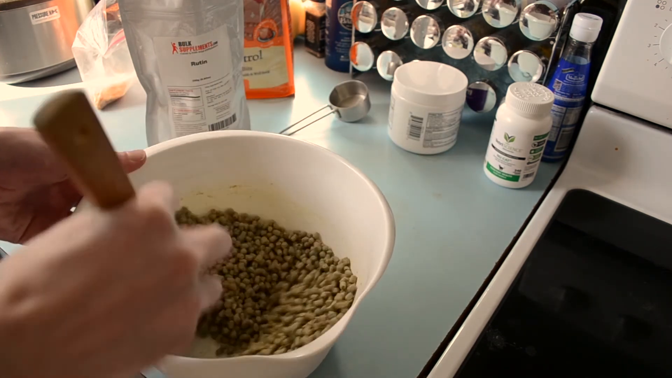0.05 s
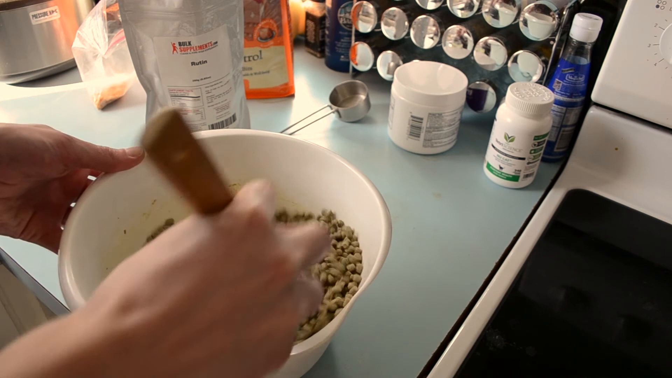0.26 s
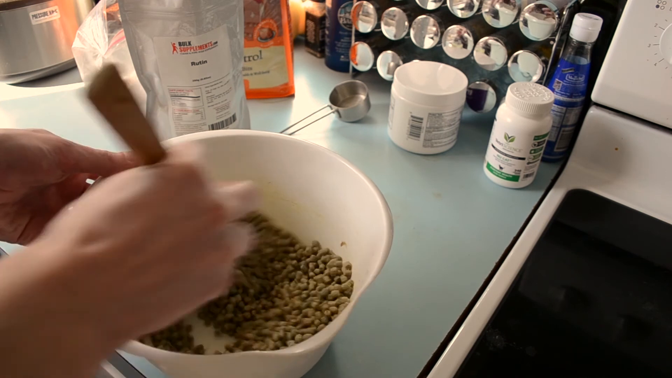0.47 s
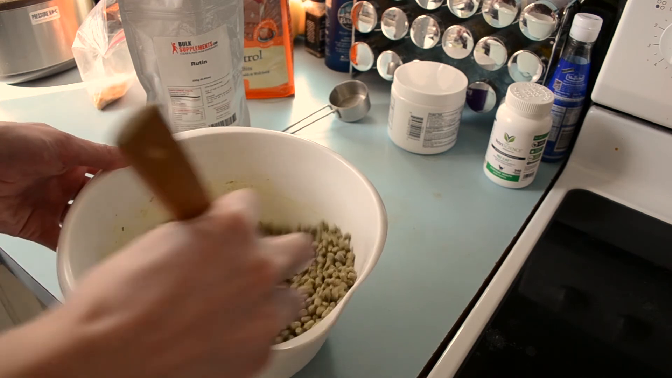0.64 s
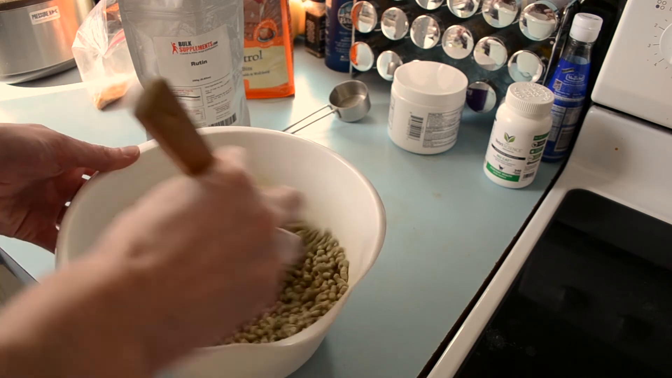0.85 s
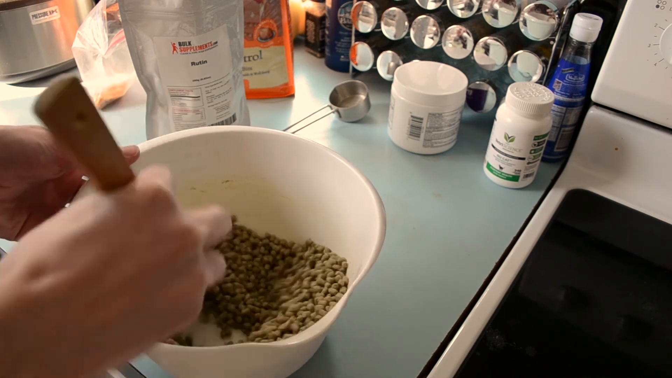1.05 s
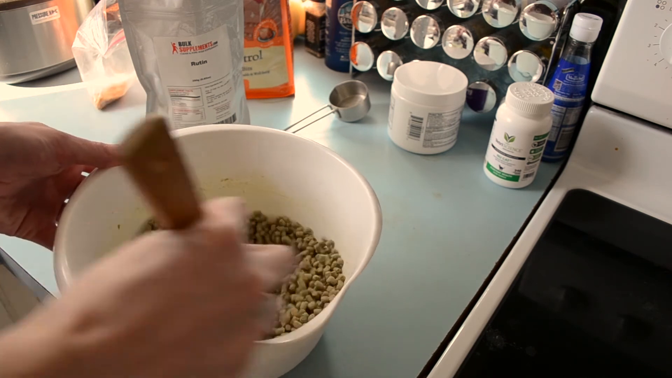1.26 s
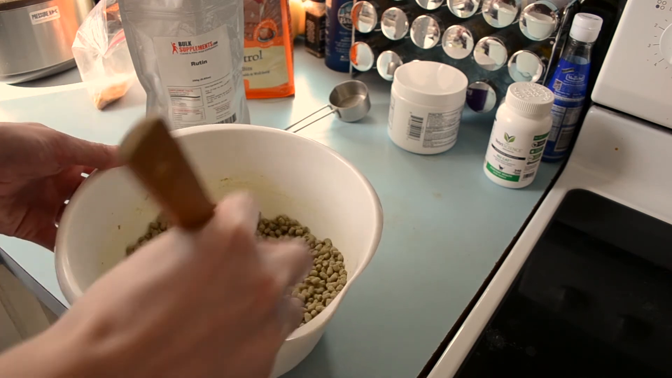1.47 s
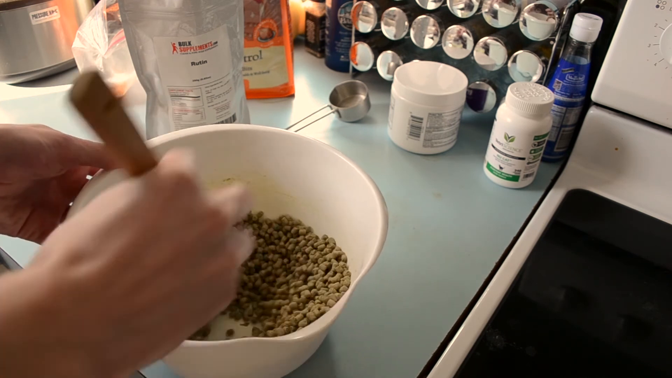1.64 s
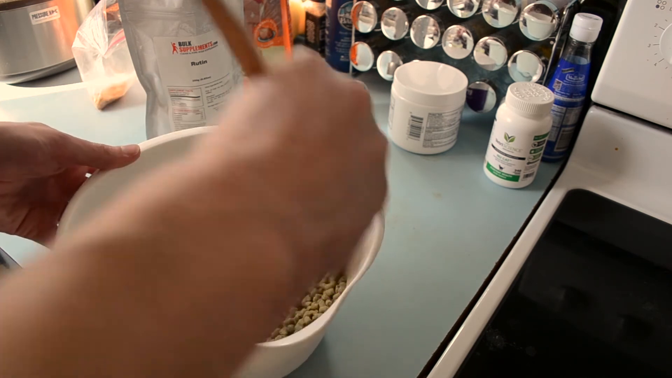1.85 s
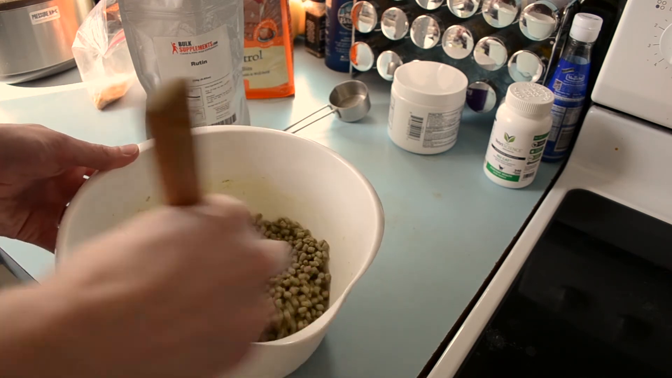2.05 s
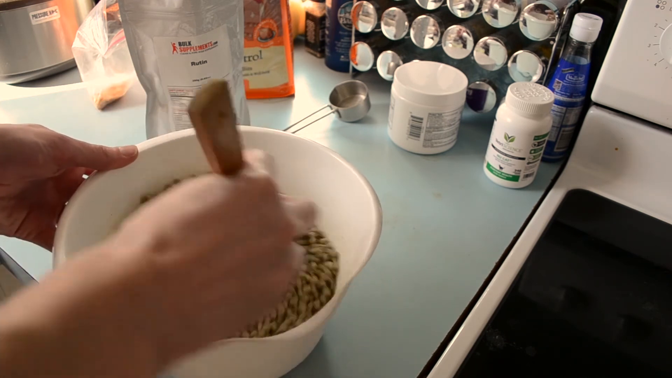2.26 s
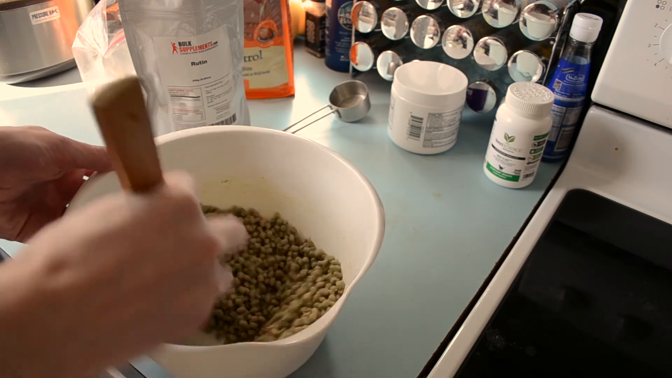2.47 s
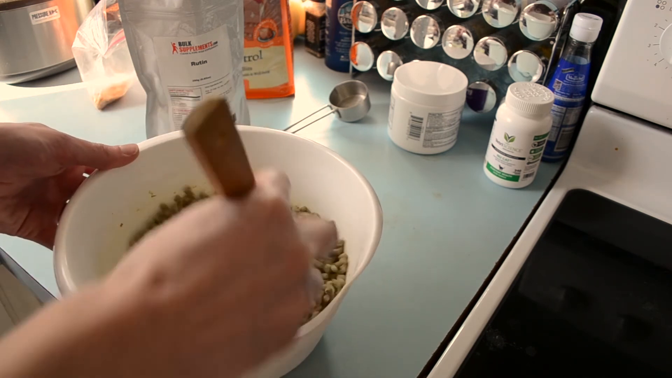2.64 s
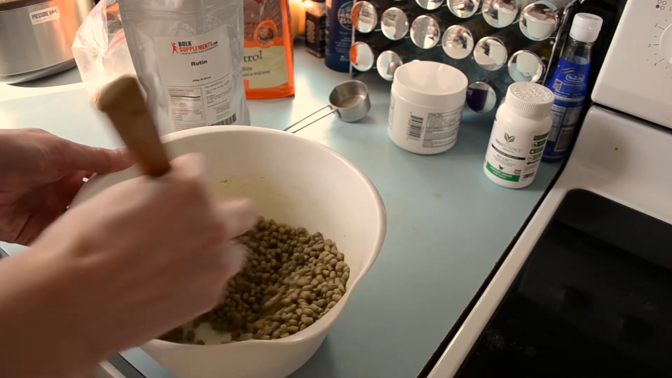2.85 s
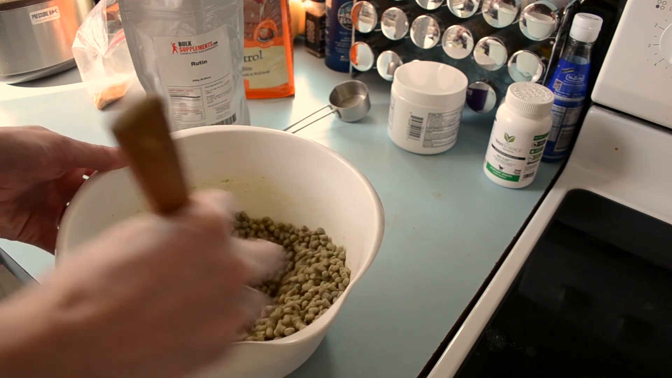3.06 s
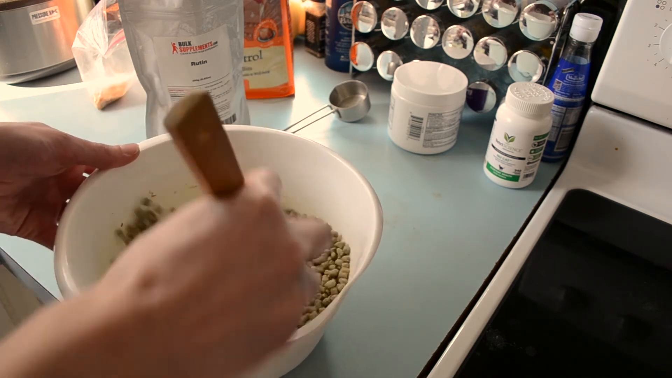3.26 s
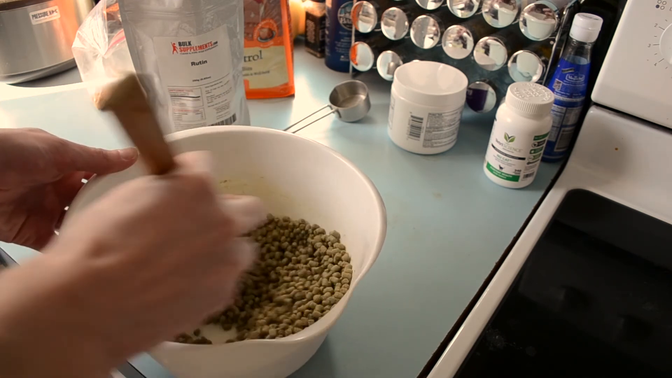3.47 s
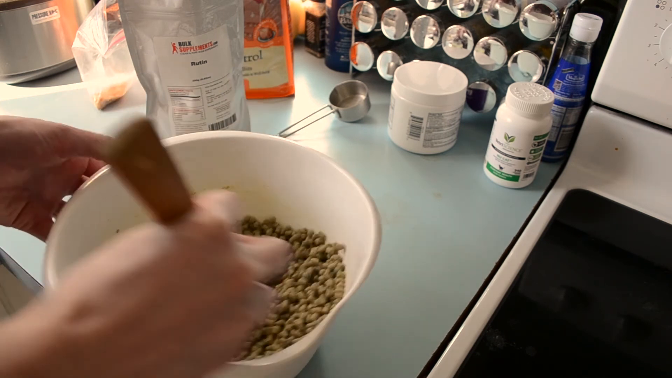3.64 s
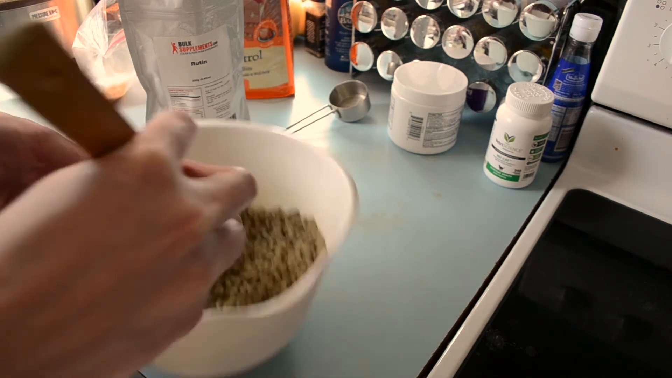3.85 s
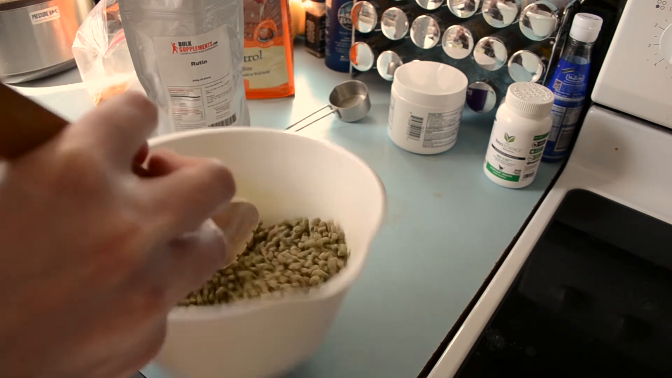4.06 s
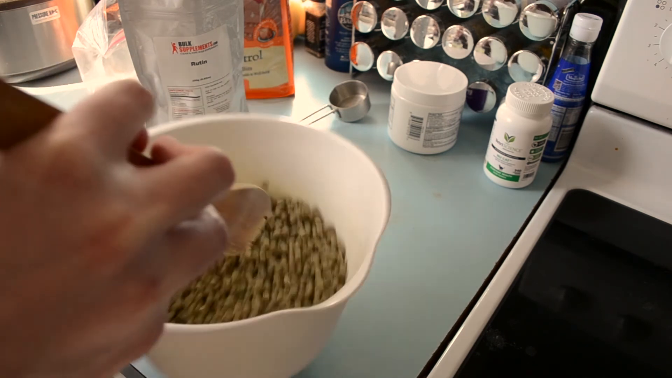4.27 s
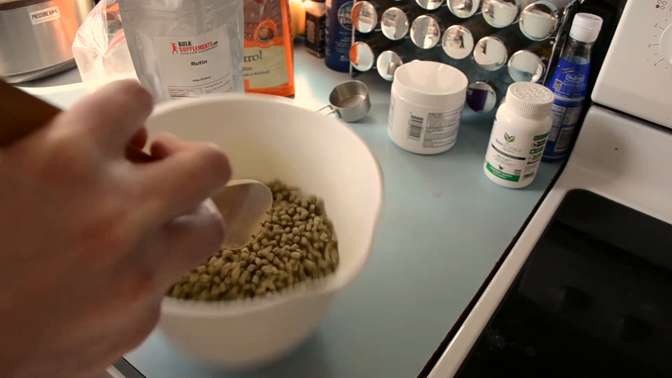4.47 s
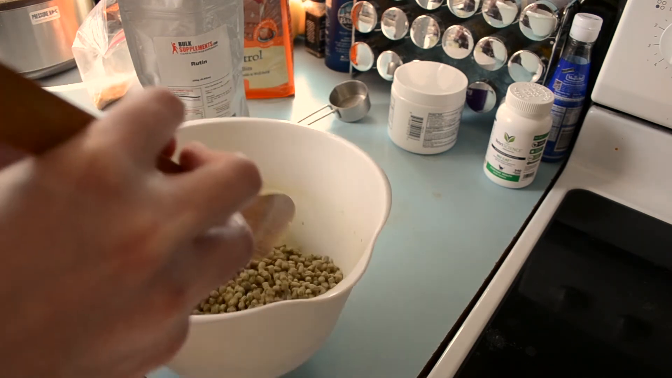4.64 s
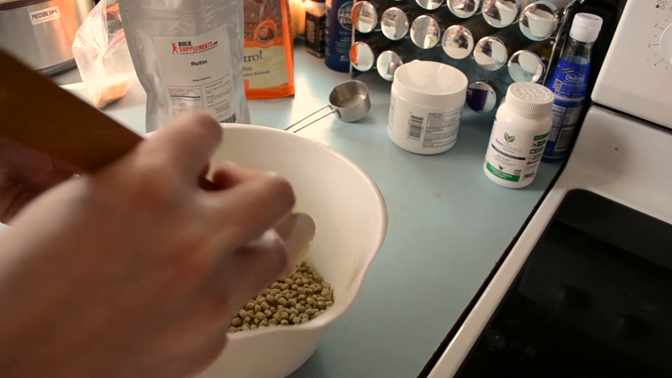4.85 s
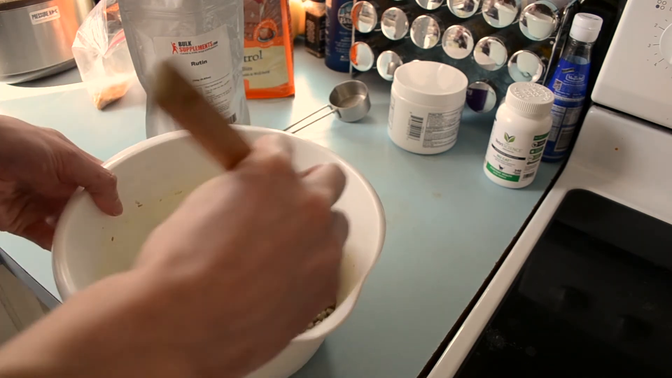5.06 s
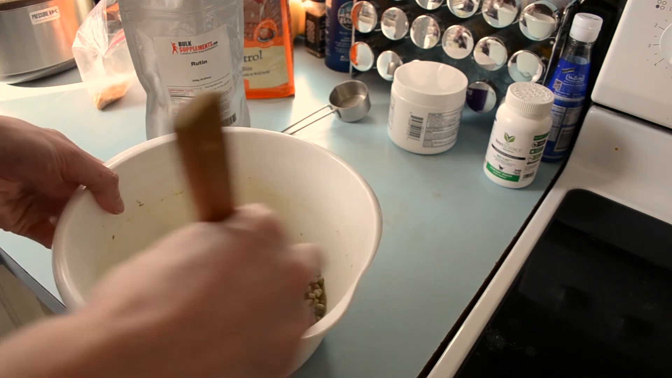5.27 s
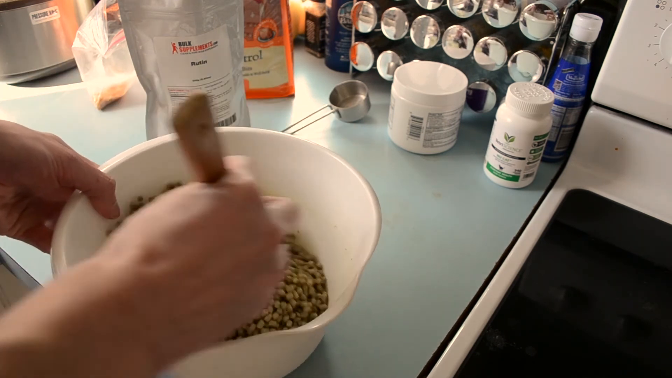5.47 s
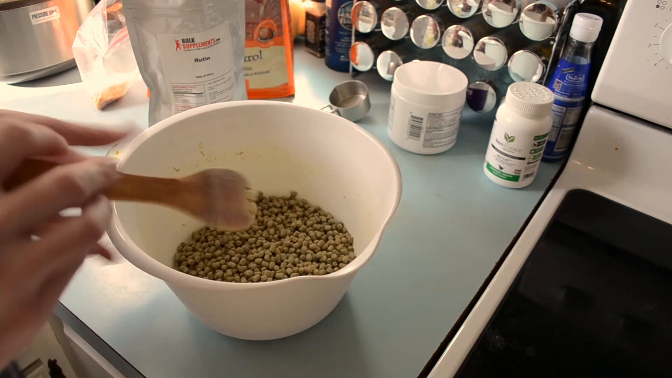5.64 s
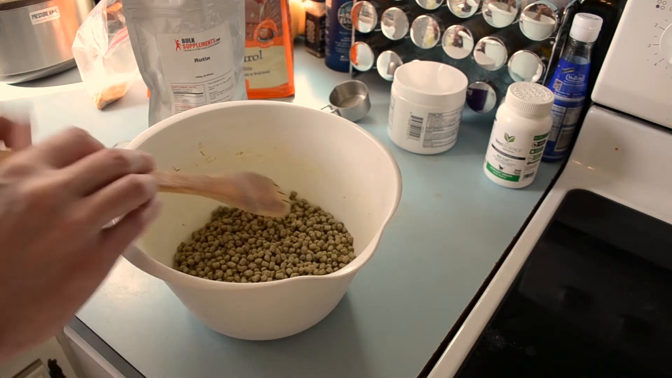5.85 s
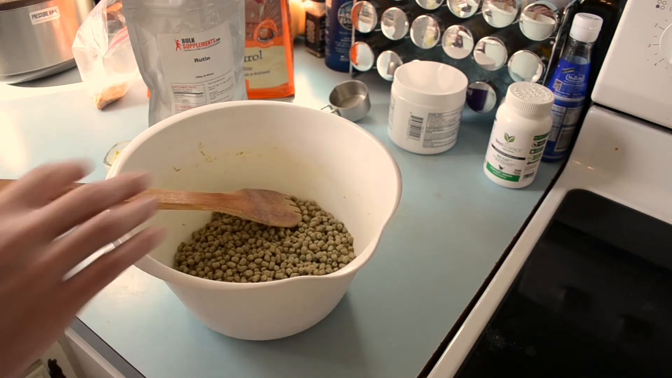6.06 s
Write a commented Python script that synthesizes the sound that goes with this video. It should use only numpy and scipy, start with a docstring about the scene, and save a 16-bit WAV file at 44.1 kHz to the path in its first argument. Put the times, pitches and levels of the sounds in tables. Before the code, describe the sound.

Dense dry clicking and rustling of pellets being stirred in a plastic bowl, heard close with a short room echo. Strokes rise and fall about two or three a second, with ticks and light knocks. Midway the flow nearly stops, then loud clattering slides and a rubbing scrape break out. Stirring returns briefly, stops abruptly to faint room noise, and a single hard hollow knock rings.

```python
"""A wooden spoon stirs hard pellets in a plastic bowl on a kitchen counter, heard from close by.
The pellets are dense random clicks, filtered and ringing; single ones crack or tick.
The bowl wall rumbles and is knocked (ringing modes), the base bumps, and once the bowl drags over the counter.
At a cut the stirring and its echo end at once; after a short pause the spoon taps the bowl hard.
Filtered noise makes the kitchen background, and decaying noise makes the echo of the room."""
import sys
import numpy as np
from scipy import signal
from scipy.fft import rfft, irfft
from scipy.io import wavfile

SR = 44100
rng = np.random.default_rng(int(sys.argv[2]) if len(sys.argv) > 2 else 0)


def dump_mix(stems):
    """Bounce the given channels to the path in sys.argv[1] as a 16-bit WAV at rate SR."""
    frames = np.atleast_2d(stems).T  # one column per channel
    limited = np.clip(frames, -1, 1)  # hard clip at full scale
    pcm = np.round(limited * 32767).astype(np.int16)
    wavfile.write(sys.argv[1], SR, pcm)


N = 269539   # length [samples]
CUT_S = 5.683   # the sound is cut: stirring and echo end at once [s]

# All levels in the tables are relative ones.
# vigour of the stirring, heard as the trickle of loose pellets: (time [s], level [dB])
TRICKLE = [(0.0, -38), (0.28, -37.5), (0.375, -44.5), (0.39, -37.5), (1.25, -39), (1.3, -44.5), (1.52, -42),
           (1.69, -45), (1.8, -55.5), (1.855, -70), (1.93, -50), (2.1, -42), (2.42, -39), (3.3, -38.5),
           (3.39, -46.5), (3.405, -38), (3.58, -38), (3.66, -49), (3.8, -59), (3.95, -66), (4.7, -59.5),
           (4.95, -74), (5.13, -59), (5.25, -40.5), (5.68, -39)]
TRICKLE_TREBLE_DB, TRICKLE_WALL_DB = 2.5, -14   # against the trickle

# the spoon ploughs through the heap, a dull swell:
# (time of the crest [s], rise [s], fall [s], pellet level [dB], bowl wall level [dB])
STROKES = [(0.0, .05, 0.099, -29, -41.5), (0.435, .03, 0.1, -35, -42.5), (0.56, 0.17, 0.12, -35, -63),
           (0.87, 0.2, 0.16, -34.5, -49.5), (1.23, 0.11, 0.072, -31.5, -57),
           (1.51, 0.23, 0.041, -31.5, -52.5), (2.1, 0.1, 0.056, -37, -43), (2.46, 0.19, 0.084, -32, -50.5),
           (2.848, 0.24, 0.033, -31.5, -46.5), (3.13, 0.027, 0.45, -35.5, -49),
           (3.41, 0.0082, 0.17, -32.5, -53), (3.57, 0.049, 0.3, -38, -53.5),
           (5.27, 0.087, 0.068, -47.5, -48), (5.52, 0.071, 0.11, -31, -52), (5.67, 0.14, 0.072, -33, -49)]
SWELL_DB, STROKE_TREBLE_DB = 12.5, -5   # drop from the crest after one rise or fall time; treble offset

# the heap is jolted and slides:
# (time at full strength [s], rise [s], hold [s], level [dB], treble against the rest [dB])
SLIDES = [(1.764, .005, 0.011, -38.5, -28), (1.885, .003, 0.021, -40.5, -16),
          (1.974, .02, 0.022, -41.5, -2), (2.215, .005, .1, -42.5, 13), (3.683, .01, 0.033, -39.5, -1),
          (3.842, .003, 0.026, -37, -19), (4.007, .03, .03, -40.5, -27), (4.04, .005, 0.032, -37.5, -6),
          (4.093, .03, 0.031, -34, -13), (4.202, .02, 0.014, -29, 2), (4.251, .02, 0.02, -36, 2.5),
          (4.353, .03, 0.026, -29, -0.5), (4.392, .02, 0.026, -34, -8), (4.455, .003, 0.036, -24.5, 6),
          (4.515, .01, 0.012, -26, -27), (4.626, .04, 0.021, -24.5, -12.5), (4.718, .01, 0.013, -38.5, -16),
          (4.983, .02, 0.019, -43.5, -4)]
SLIDE_RISE_DB, SLIDE_WALL_DB = 19, -24.5   # climb in one rise time; wall against the pellets
SLIDE_FALL_DB_PER_S, TREBLE_FALL_DB_PER_S = 310, 467

# the spoon opens a hollow in the heap: (time [s], middle of its wandering pitch [Hz])
HOLLOW = [(0.0, 2050), (1.27, 2330), (1.65, 1720), (2.28, 2260), (4.21, 2290), (4.6, 1790), (5.09, 1660),
          (5.39, 2260), (5.68, 2470)]
# colour of the pellets: (frequency [Hz], level per Hz [dB])
PELLET_COLOUR = [(410, -33), (700, -8.5), (968, -10), (1050, -7), (1450, -1.5), (2880, -3), (6600, -7.5),
                 (7420, -11), (8780, -7), (9370, -11), (10800, -29), (12100, -33), (14000, -27),
                 (15500, -45)]
# ringing modes of the bowl wall: (frequency [Hz], level [dB], time to fall by 60 dB [s])
BOWL_MODES = [(188, -13.5, 0.028), (236, -11, 0.088), (340.3, -3.5, 0.051), (416, 0.5, 0.061),
              (493.3, -2.5, 0.11), (543, -3, 0.076), (616, 1.5, 0.048), (768, -6, 0.064), (953, -10, 0.056),
              (1049, -5, 0.095), (1186, 3.5, 0.024), (1178, -3, 0.05), (1385, 7.5, 0.015), (1510, 2, 0.061),
              (1660, -6.5, 0.16), (1810, 1, 0.036), (2150, -15.5, 0.033), (2540, 8, .02), (3000, 0, 0.037),
              (3980, -16, 0.0025)]
# kitchen background: (frequency [Hz], level per Hz [dB])
KITCHEN_COLOUR = [(18, -61), (30, -18), (92, -10.5), (164, -24), (243, -12), (300, -12.5), (1140, -12.5),
                  (1970, -8.5), (3150, -13.5), (4790, -11.5), (7470, -24.5), (9210, -20), (15500, -65)]
KITCHEN_BEFORE_DB, KITCHEN_AFTER_DB = -64.7, -58   # before and after the cut

# spoon and pellets knock the wall: (time [s], peak level [dB], hardness as tilt of the modes [dB per octave])
KNOCKS = [(0.004, -21.5, -5), (0.283, -33.5, -4.5), (0.305, -30.5, -6), (0.429, -28.5, -0.5),
          (0.517, -34, -1), (0.616, -40, -3), (0.646, -30.5, -5.5), (1.073, -28, -0.5), (1.73, -42, 1.5),
          (1.865, -32, -0.5), (2.091, -32, -1.5), (2.166, -31.5, -2.5), (2.245, -37.5, -7),
          (2.373, -29, -3), (2.519, -31, -1.5), (2.688, -37, -5), (2.816, -29, 1), (2.831, -28, -4),
          (3.128, -31, 0), (3.429, -29, -2), (3.951, -40.5, -6.5), (4.455, -18, -6.5), (4.518, -22.5, 2),
          (4.533, -26.5, -5), (4.542, -25, -4.5), (4.567, -19.5, -3.5), (4.954, -18, -4), (5.08, -36, -6),
          (5.121, -39.5, -1), (5.138, -35.5, -6.5), (5.405, -27.5, -3.5), (5.984, -16.5, -0.5)]
# reverberation: (frequency [Hz], time to fall by 60 dB [s])
ROOM = [(150, 0.67), (500, 0.35), (2000, 0.43), (3500, .25), (6000, 0.1), (12000, 0.13)]

# smaller cracks at random: how many; middle values of peak over the heap, pitch and treble
SMALL_CRACKS = 30
SMALL_DB, SMALL_HZ, SMALL_TREBLE_DB = 8.5, 2140, -13
# single cracks and ticks at set times, loud and quiet:
# (time [s], peak level [dB], pitch [Hz], treble against the peak [dB])
TIMED_CRACKS = [(0.386, -23, 2430, -9), (0.4299, -14.5, 1780, -21), (0.503, -15, 2510, -28),
                (0.5726, -14, 2770, -22), (0.7094, -17, 1770, -13.5), (0.8016, -15, 2450, -30),
                (0.869, -15, 2300, -27), (0.9725, -26.5, 1960, -0.5), (1.148, -18, 2340, -10),
                (1.1694, -16.5, 2800, -22), (1.232, -22.5, 1960, -17), (1.3124, -34, 2250, 3.5),
                (1.383, -24, 1530, -21), (1.5973, -23, 1455, -11.5), (1.633, -19.5, 1870, -30),
                (1.682, -20.5, 1760, -13.5), (1.7258, -31.5, 1640, -7), (1.7644, -25, 4340, -7),
                (1.8257, -31.5, 2370, -27), (1.8672, -22.5, 2350, -24), (1.884, -34, 3050, -15),
                (2.0297, -20, 2380, -18), (2.2155, -26.5, 2940, -3.5), (2.3254, -14.5, 4240, -14.5),
                (2.4777, -13.5, 2980, -21), (2.708, -17.5, 2060, -15.5), (2.8522, -11, 2840, -28),
                (3.004, -16, 5200, -13), (3.0092, -25, 2130, -6), (3.048, -30, 1740, -19),
                (3.4028, -17.5, 4430, -25), (3.4994, -16, 2600, -15.5), (3.5734, -15.5, 2580, -45),
                (3.6845, -23, 1940, -10), (3.7238, -24, 3000, -4.5), (3.8011, -23.5, 2220, -26),
                (3.8415, -26.5, 4740, -12), (4.034, -31, 2300, -4.5), (4.184, -19, 2250, -16),
                (4.2025, -16.5, 1930, -14), (4.2434, -11.5, 2240, -17), (4.273, -16, 2880, -29),
                (4.3412, -24, 1790, -29), (4.4528, -5.5, 2150, -19), (4.4814, -26, 1620, -23),
                (4.4955, -7.5, 2850, -17), (4.6347, -5.5, 2340, -20), (4.7193, -27, 1940, -15.5),
                (4.779, -23, 2350, -33), (4.8199, -20.5, 2450, -39), (4.857, -31.5, 2280, -26),
                (4.9561, -6, 1735, -48), (5.0813, -25.5, 1870, -30), (5.262, -19, 1595, -13),
                (5.4675, -23, 4000, -6), (5.5142, -14, 2270, -32.5), (5.5958, -15, 2600, -14),
                (5.9675, -37, 5420, -12), (5.972, -23, 5150, -25), (5.9842, -1, 2144, -43),
                (6.0886, -29, 2130, -33)]
# dull bumps of the base on the counter: (time [s], peak level [dB])
BUMPS = [(2.259, -48), (4.457, -64), (5.983, -36)]

# the bowl drags over the counter: (time [s], level [dB])
DRAG = [(4.505, -51), (4.523, -20.5), (4.54, -16), (4.551, -26.5), (4.649, -22), (4.76, -68)]
# modes of the base rubbing on the counter: (frequency [Hz], width [Hz], level [dB])
COUNTER_MODES = [(485, 49, 5.5), (580, 110, 4), (775, 75, 3), (925, 59, 4.5), (1264, 57, 3),
                 (1760, 37, -7.5), (2340, 90, -30)]


def amp(db):
    """Gain of a level in dB."""
    return 10 ** (np.asarray(db) / 20)


def power_db(*levels_db):
    """Level of unrelated sounds together: their powers add."""
    return 10 * np.log10(sum(amp(db) ** 2 for db in levels_db) + 1e-20)


def rms_one(x):
    """Scale to rms 1."""
    return x / np.sqrt(np.mean(x ** 2) + 1e-20)


def in_time(rows):
    """Draw straight lines between table rows: one value per sample for each column after the time."""
    s, *columns = np.transpose(rows)
    return [np.interp(np.arange(N) / SR, s, c) for c in columns]


def at_hz(points, hz):
    """Read a table on a log-frequency axis."""
    table_hz, values = np.array(points)[:, 0], np.array(points)[:, 1]
    return np.interp(np.log(hz), np.log(table_hz), values)


def filtered(x, order, hz, kind="low"):
    """Butterworth filter: keep what lies below, above or between the given frequencies."""
    return signal.sosfilt(signal.butter(order, hz, kind, fs=SR, output="sos"), x)


def colour(x, spectrum):
    """Causal (minimum-phase) filter of that spectrum; white noise keeps its rms."""
    size = 4096
    hz = np.maximum(np.arange(size // 2 + 1) * SR / size, 1)
    log_gain = at_hz(spectrum, hz) * np.log(10) / 20
    # folding the cepstrum forward in time makes the filter respond as early as it can
    cepstrum = irfft(log_gain)
    cepstrum[1:size // 2] *= 2
    cepstrum[size // 2 + 1:] = 0
    response = irfft(np.exp(rfft(cepstrum)))
    return signal.fftconvolve(x, response / np.linalg.norm(response))[:N]


def drift(rate):
    """Slow random wandering of rms 1, smoothed above the rate in Hz."""
    r = np.exp(-2 * np.pi * rate / SR)
    noise = rng.standard_normal(N + SR)
    settled = signal.lfilter([1], [1, -2 * r, r * r], noise)[SR:]
    return rms_one(settled)


def ring(clicks, hz, t60):
    """A unit click sets a sine of height about 1 ringing; it falls by 60 dB in t60 seconds."""
    r, w = amp(-60 / (t60 * SR)), 2 * np.pi * hz / SR
    return signal.lfilter([0, np.sin(w)], [1, -2 * r * np.cos(w), r * r], clicks + 1e-18)


def grains(per_s, spread_db):
    """Random clicks, mostly small, a few large; rms 1."""
    heights = amp(spread_db * np.minimum(rng.exponential(1, N), 5))
    signs = rng.choice([-1, 1], N)
    return rms_one(heights * signs * (rng.random(N) < per_s / SR))


def heap_motion():
    """Trickle, strokes and slides add up to the levels of the pellets, their treble and the wall."""
    t, trickle = np.arange(N) / SR, in_time(TRICKLE)[0]
    body, treble, shell = [trickle], [trickle + TRICKLE_TREBLE_DB], [trickle + TRICKLE_WALL_DB]
    for s, rise_s, fall_s, db, wall_db in STROKES:
        side_s = np.where(t < s, rise_s, fall_s)
        shape = -SWELL_DB * np.abs((t - s) / side_s) ** 0.87
        body.append(db + shape)
        treble.append(db + STROKE_TREBLE_DB + shape)
        shell.append(wall_db + shape)
    for s, rise_s, hold_s, db, treble_db in SLIDES:
        rise = SLIDE_RISE_DB * np.minimum(t - s, 0) / rise_s
        after = np.maximum(t - s - hold_s, 0)
        body.append(db + rise - SLIDE_FALL_DB_PER_S * after)
        treble.append(db + treble_db + rise - TREBLE_FALL_DB_PER_S * after)
        shell.append(body[-1] + SLIDE_WALL_DB)
    pellet_db = power_db(*body)
    return pellet_db, power_db(*treble) - pellet_db, power_db(*shell)


def pellets(level_db, treble_db):
    """Collisions come in clumps and ring a few cycles, loudest near the hollow's pitch, over a fine rustle."""
    clumps = amp(2.0 * drift(25) + 1.7 * drift(90))
    hits = grains(2500 * clumps, spread_db=3.0)
    pitches = np.geomspace(900, 6500, 24)
    dealt = rng.integers(0, 24, N)   # which pitch each hit gets
    hollow_hz = in_time(HOLLOW)[0] * 2 ** (0.12 * drift(32))
    rings = np.zeros(N)
    for k, hz in enumerate(pitches):
        octaves_off = np.log2(hz / hollow_hz)
        boost = amp(6.2 * np.exp(-(octaves_off / 0.41) ** 2))
        rings += rms_one(ring(hits * (dealt == k), hz, 15.5 / hz)) * np.sqrt(hz) * boost
    rustle = grains(14000 * clumps, spread_db=2.2)
    heap = colour(amp(-3.5) * rms_one(rings) + rustle, PELLET_COLOUR)
    low, high = filtered(heap, 2, 4000), filtered(heap, 2, 4000, "high")
    # with one part turned over, the two join without a dip at 4 kHz
    return amp(level_db - 7.5) * (low - amp(treble_db - 1) * high)


def wall(level_db):
    """Pellets pushed along the wall keep its low modes rumbling."""
    push = filtered(grains(900 * amp(2.5 * drift(30)), spread_db=2.5), 2, 750)
    modes = sum(amp(db) * ring(push, hz, t60) * (-1) ** k   # every other mode is turned over
                for k, (hz, db, t60) in enumerate(BOWL_MODES))
    return amp(level_db - 1.0) * rms_one(modes)


def kitchen(before):
    """Steady coloured noise, a little louder after the cut."""
    level_db = np.where(before, KITCHEN_BEFORE_DB, KITCHEN_AFTER_DB)
    return amp(level_db) * colour(rng.standard_normal(N), KITCHEN_COLOUR)


def knocks():
    """Each mode gets its own strength; a hard blow reaches the high modes; loose pellets rattle after it."""
    s, peak_db, tilt_db = np.transpose(KNOCKS)
    at, out = np.round(s * SR).astype(int), np.zeros(N)
    chance_db = rng.normal(0, 2.9, (len(KNOCKS), len(BOWL_MODES)))
    rattle = amp(-8.5) * (rng.random(N) < 250 / SR) * rng.standard_normal(N)   # 250 clicks per second
    fade = np.exp(-1 / (0.033 * SR))   # the rattle dies with a time constant of 33 ms
    for k, (hz, level_db, t60) in enumerate(BOWL_MODES):
        clicks = np.zeros(N)
        clicks[at] = amp(peak_db + level_db - 8.5 + tilt_db * np.log2(hz / 500) + chance_db[:, k])
        clicks += rattle * signal.lfilter([1], [1, -fade], clicks + 1e-18)
        out += ring(clicks, hz, t60) * (-1) ** k
    return out


def room(x):
    """Echo of the kitchen: noise that dies band by band."""
    t, edges = np.arange(SR // 2) / SR, 100 * 2. ** (np.arange(15) / 2)   # half-octave bands
    echo = np.zeros(len(t))
    for low, high in zip(edges, edges[1:]):
        band = filtered(rng.standard_normal(len(t)), 2, [low, high], "band")
        echo += band * amp(-60 * t / at_hz(ROOM, np.sqrt(low * high)))
    echo *= np.clip(t / 0.0017, 0, 1)   # the echo fades in over 1.7 ms
    return x + amp(-14.5) * signal.fftconvolve(x, echo / np.linalg.norm(echo))[:N]


def small_cracks(level_db):
    """Random rows like those of the timed cracks, more frequent where the stirring is brisk."""
    share = np.cumsum(amp(in_time(TRICKLE)[0]) * (np.arange(N) < CUT_S * SR))
    chance, spread = rng.random(SMALL_CRACKS), rng.standard_normal((SMALL_CRACKS, 3))
    at = np.searchsorted(share, chance * share[-1])
    peak_db = level_db[at] + SMALL_DB + 3 * spread[:, 0]
    pitch_hz = SMALL_HZ * 2 ** (0.344 * spread[:, 1])
    treble_db = SMALL_TREBLE_DB + 4 * spread[:, 2]
    return list(zip(at / SR, peak_db, pitch_hz, treble_db))


def cracks(rows):
    """A short ring at the pellet's pitch, with a sharp burst of noise and a softer tail that fades more slowly."""
    body, top, t = np.zeros(N + SR), np.zeros(N + SR), np.arange(SR // 20) / SR
    puff_fade = np.exp(-t / 0.0009) + 0.5 * np.exp(-t / 0.0059)
    puffs = rng.standard_normal((len(rows), len(t))) * puff_fade
    for (s, peak_db, hz, treble_db), puff in zip(rows, puffs):
        at = round(s * SR)
        tone = np.sin(2 * np.pi * hz * t) * np.exp(-t * hz / 12.3)   # fades over a few cycles
        near = signal.lfilter(*signal.butter(1, [hz * 0.59, hz * 1.73], "band", fs=SR), puff)
        body[at:at + len(t)] += amp(peak_db - 12.0) * (0.32 * tone + 1.43 * near)
        top[at:at + len(t)] += amp(peak_db + treble_db + 4.0) * puff
    high = filtered(top, 2, 4000, "high")
    return colour((body + high)[:N], PELLET_COLOUR)


def bumps():
    """One slow push each: a dull 82 Hz ring that the counter damps within a few hundredths of a second."""
    clicks = np.zeros(N)
    clicks[[round(s * SR) for s, db in BUMPS]] = [amp(db) for s, db in BUMPS]
    return ring(clicks, 82, 0.033)


def drag():
    """Uneven slips of the base excite bowl and counter together; part of each slip is heard bare."""
    t = np.arange(N) / SR
    slips = grains(1000, spread_db=2.0)
    modes = np.zeros(N)
    for k, (hz, width, db) in enumerate(COUNTER_MODES):
        t60 = np.log(1000) / (np.pi * width)   # a wide mode dies quickly
        modes += amp(db) * rms_one(ring(slips, hz, t60)) * (-1) ** k
    bare = filtered(slips, 2, [400, 2200], "band")
    # 17 ms ramps at the start and the end of the drag
    moving = np.clip(np.minimum(t - DRAG[0][0], DRAG[-1][0] - t) / 0.017, 0, 1)
    return amp(in_time(DRAG)[0] - 1.0) * moving * (rms_one(modes) + amp(-10.5) * rms_one(bare))


def scene():
    """At the cut stirring and echo end at once; after it only the spoon tap's blows sound in the bowl."""
    pellet_db, treble_db, wall_db = heap_motion()
    before = np.arange(N) < CUT_S * SR
    blows = cracks(list(TIMED_CRACKS) + small_cracks(pellet_db)) + knocks()
    stirring = (pellets(pellet_db, treble_db) + wall(wall_db) + drag() + blows) * before
    spoon_tap = blows * ~before
    bowl = room(stirring) * before + room(spoon_tap)
    bowl = filtered(bowl, 3, 130, "high")   # a small bowl radiates no deep bass
    return (bowl + bumps() + kitchen(before))[None]


def record(dry):
    """The top is cut: everything above 16.3 kHz is at least 70 dB weaker."""
    return signal.sosfilt(signal.cheby2(12, 70, 16300, fs=SR, output="sos"), dry)


dry = scene()
out = record(dry)
dump_mix(out)
```